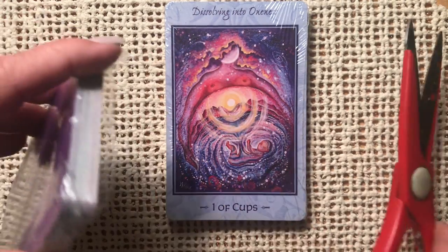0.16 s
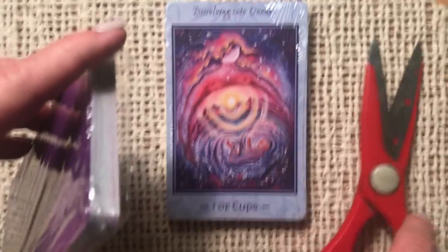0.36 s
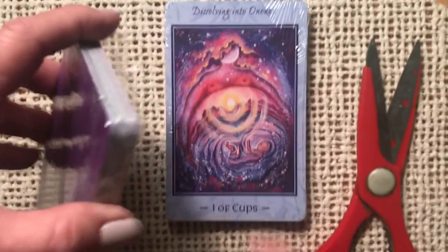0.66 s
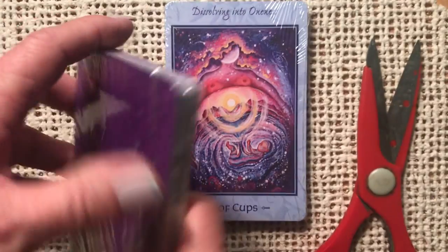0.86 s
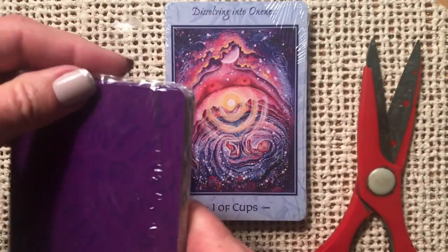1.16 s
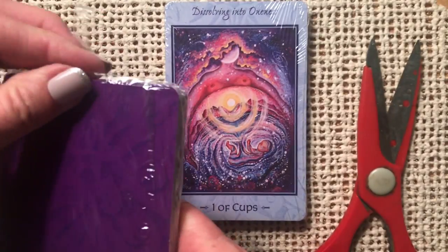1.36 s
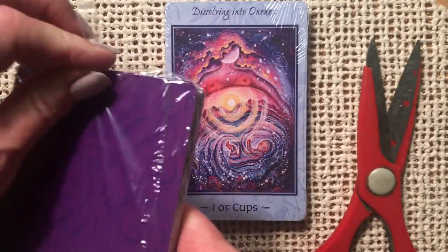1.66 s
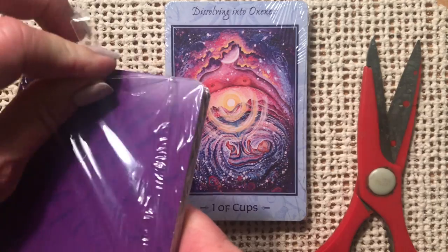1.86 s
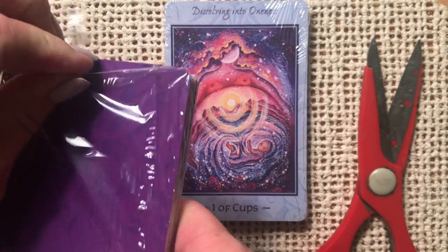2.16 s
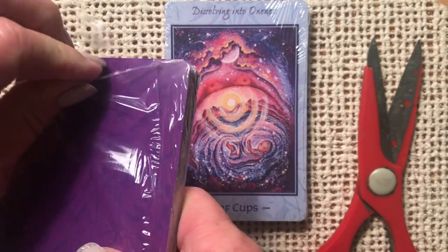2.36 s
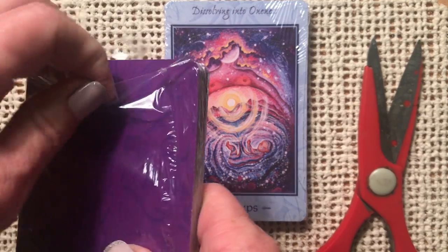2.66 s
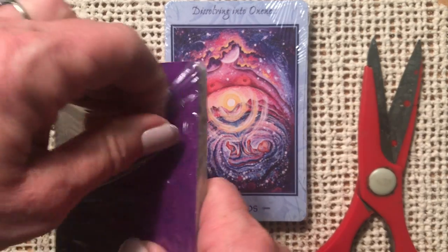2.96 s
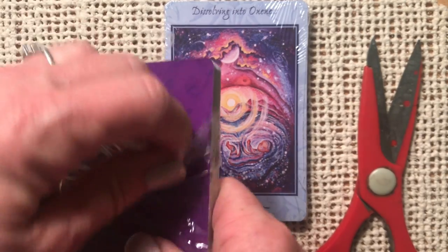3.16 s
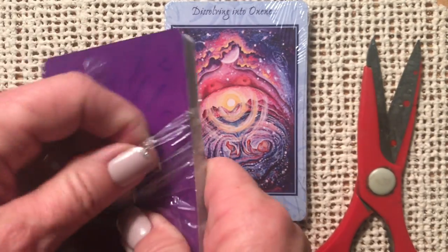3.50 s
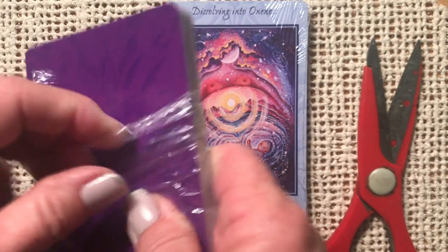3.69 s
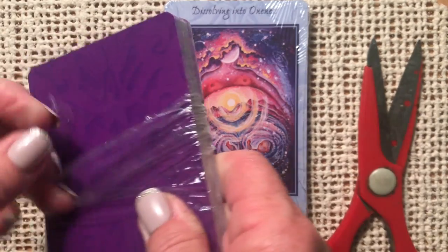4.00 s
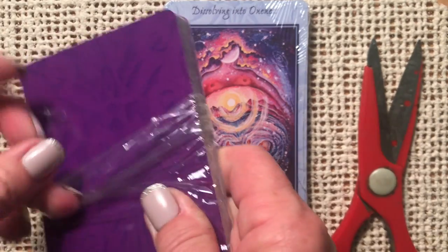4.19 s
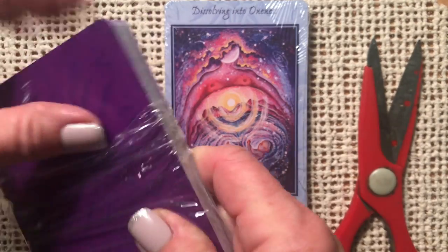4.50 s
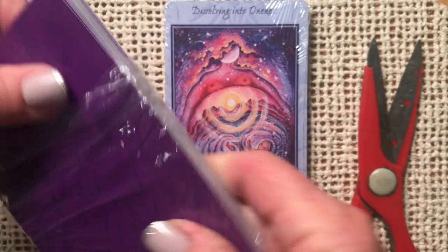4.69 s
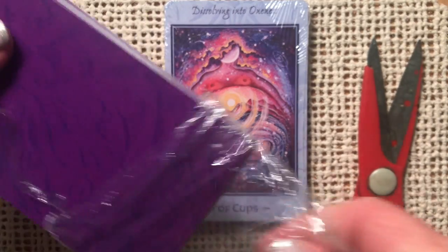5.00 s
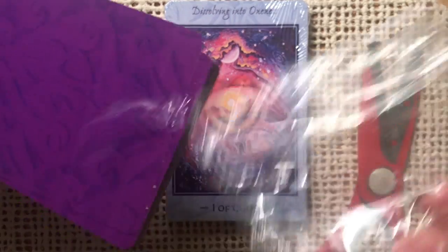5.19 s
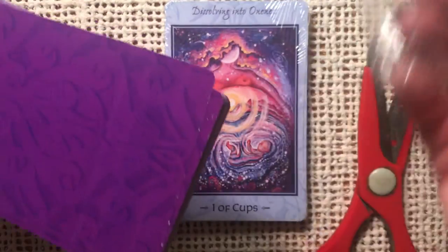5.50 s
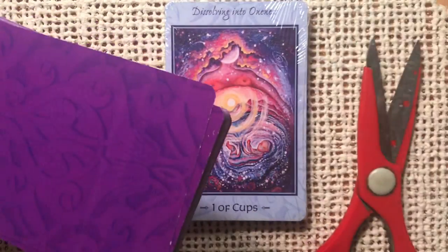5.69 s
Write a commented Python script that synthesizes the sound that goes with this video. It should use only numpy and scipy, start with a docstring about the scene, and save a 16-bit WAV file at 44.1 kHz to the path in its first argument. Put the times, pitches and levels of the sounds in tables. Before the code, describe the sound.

Tight plastic shrink wrap crackles and snaps as it is picked at and peeled off a deck of cards.

```python
"""Tight plastic film is picked at, stretched and pulled off a deck of cards over a cloth-covered table.
Large creases buckle with short snaps that ring the freed film and thump the deck; small ones make a
fine crackle that swells with each tug, over finger rub. Scissors and a hand bump the table, and the
blades clink as they settle. A quiet room rumbles below."""
import sys
import numpy as np
from scipy import signal
from scipy.fft import rfft, irfft
from scipy.io import wavfile

SR = 44100
rng = np.random.default_rng(int(sys.argv[2]) if len(sys.argv) > 2 else 0)


def waveform_to_disk(signal):
    """Save audio, clipped to [-1, 1], as 16-bit WAV at the path in sys.argv[1]."""
    frames = np.transpose(np.atleast_2d(signal))
    scaled = np.clip(frames, -1, 1) * 32767
    samples = np.round(scaled).astype(np.int16)
    wavfile.write(sys.argv[1], SR, samples)


N = 257984

# large creases buckling: start_s, level_db, patch_hz, thump_db, crack_db (last two re level_db)
SNAPS = [(.0519, -26.5, 2970, -36, 11.5), (0.1652, -27, 5730, -9.5, -8), (.223, -25, 6100, -24, -2),
         (0.2637, -35, 9260, -17, 14), (.2855, -31.5, 7020, -28, 4), (.3118, -41.5, 9500, -20, 21.5),
         (0.543, -33, 8910, -20, 10), (.599, -32, 6200, -10, 2), (0.764, -39, 1490, -10, 2),
         (.84, -34, 2180, -9, -1), (0.853, -34, 9000, -12, 5), (.866, -29, 2600, -20, -6),
         (1.011, -25, 2280, -14, 1), (1.0338, -33, 6000, -6, 7.5), (1.041, -32.5, 9000, -21, 14.5),
         (1.1561, -32.5, 2640, -6, 12), (1.1707, -38, 7770, -3, 9), (1.1956, -33, 8500, -3, 16),
         (1.263, -40, 9500, -4, 18), (1.3263, -35.5, 7060, -12, 12), (1.402, -33, 7060, -27, 4),
         (1.585, -20.5, 5860, -25, -5), (1.6365, -30, 6500, -6.5, 7), (1.705, -37, 2830, 2.5, 11),
         (1.7286, -23, 8900, -28, 11), (1.7511, -27, 5840, -11, 10), (1.7624, -38.5, 2280, 0, 20.5),
         (1.8387, -13.5, 5470, -22, -4), (1.8524, -26, 2700, 1.5, 9), (1.8638, -24, 6040, -17, -3),
         (1.9263, -22, 5960, -24, 5), (1.962, -27.5, 9400, -6, 9), (1.986, -29, 6930, -11, 2),
         (2.0043, -31.5, 9500, -8, 17), (2.034, -21.5, 5530, -32, 0), (2.072, -30, 8980, -21, 7),
         (2.0866, -29.5, 2900, -6, 1), (2.1, -19.5, 5700, -17, 0), (2.129, -34, 9020, 4, 19.5),
         (2.1866, -20, 7000, -29, 4), (2.206, -29, 8330, -10, 15), (2.2193, -17, 2570, -10, 5),
         (2.2642, -26.5, 8960, -15, 18), (2.2964, -15.5, 8200, -19, -1), (2.3864, -31, 2000, -6, 11),
         (2.3977, -25, 6800, -3, 17.5), (2.437, -28.5, 5840, -6, 8), (2.4755, -13, 6560, -23, 4),
         (2.4936, -19.5, 8830, -4, -1), (2.517, -22, 3270, -9, 0), (2.5363, -23.5, 2260, -11, -4),
         (2.544, -16.5, 4940, -16, 6), (2.569, -24, 1900, -5, 10), (2.6292, -15.5, 8400, -20, 5),
         (2.6391, -15, 5660, -20, -8), (2.6521, -19.5, 5900, -13.5, 6), (2.716, -24.5, 2020, -4, -9),
         (2.743, -24, 3440, -10, 6), (2.775, -19.5, 3660, -10.5, -15), (2.8206, -14, 4200, -34, 0),
         (2.8487, -14, 6400, -17, 6), (2.874, -11, 8150, -26, -6), (2.9, -12.5, 3600, -15, 3),
         (2.925, -14, 8100, -13, 1), (2.9489, -11, 7040, -28, -2), (2.9663, -14.5, 8330, -12, 1),
         (2.9936, -17, 9320, -19, 10), (3.003, 1.5, 8500, -24, -12), (3.007, -5.5, 2030, -16, 8.5),
         (3.0223, -16, 8180, -6.5, 14), (3.033, -4.5, 6900, -19, -12), (3.047, -16, 8400, -3.5, 13),
         (3.06, -22, 8940, -22, 6), (3.0679, -26, 8760, -28, 8), (3.0947, -15, 2750, -40, -1),
         (3.189, -27, 9500, -31, 20), (3.2178, -18.5, 1630, -7.5, -8), (3.231, -16, 3970, -15, 4),
         (3.2388, -19, 2400, -24, 2), (3.247, -16, 3380, -11, 10), (3.301, -18, 5550, -12.5, 6.5),
         (3.3351, -17.5, 6870, -6, 1), (3.348, -20, 3250, -22, 14), (3.372, -15.5, 6700, -18, -7),
         (3.3936, -21, 2260, -22, 8), (3.406, -13, 6750, -32, 4), (3.4168, -15.5, 1970, -7, 1),
         (3.4271, -18, 8900, -28, -2), (3.4606, -13, 7050, -45, -0.5), (3.503, -15.5, 6720, -21, -9),
         (3.519, -21, 8400, -32, 12), (3.562, -15.5, 6700, -37, 7.5), (3.6196, -12, 7000, -46, -5.5),
         (3.7105, -5, 3400, -28.5, 3), (3.7302, -9, 6540, -26, -23), (3.7584, -6.5, 6700, -28, -3),
         (3.792, -13.5, 5900, -26, 0), (3.8259, -7.5, 6600, -27, 0.5), (3.8454, -14, 5870, -16, -1),
         (3.8504, -18, 6010, -9, 7), (3.8596, -12, 3060, -6.5, 5), (3.8722, -12, 6940, -28, 6),
         (3.926, -5.5, 7000, -33, -9), (3.9355, -0.5, 5860, -37, -24), (3.9561, -2, 3100, -6, -3),
         (3.9737, -6.5, 3320, -29, -9), (4.0013, -17, 3290, -35, 9), (4.036, -23.5, 2980, -20, 6),
         (4.1428, -22, 7460, -35, 0), (4.1763, -31, 2000, -11.5, 14), (4.2097, -27.5, 3200, -27, -2),
         (4.2859, -12, 4260, -25, -20), (4.333, -9.5, 3770, -13, -14), (4.3498, 2.5, 4000, -16.5, 0),
         (4.359, -4, 6140, -15.5, 6.5), (4.3622, -4, 4060, -11, 6), (4.3929, -19.5, 8810, -17, 11),
         (4.4217, -24, 3100, -10.5, 10.5), (4.4587, -25.5, 4100, -25, -1), (4.5412, -22, 3100, -11, -19),
         (4.638, -20.5, 6680, -9, 15.5), (4.688, -32, 7800, -15, 26.5), (4.7911, -16, 9400, -47, 15.5),
         (4.8858, 2, 5530, -17.5, -29), (4.9141, -9, 5600, -19, -3), (4.935, -1.5, 5130, -19, -29),
         (4.9476, -16, 5700, -12, -21), (5.029, -5.5, 6200, -14, 9), (5.055, -5, 6150, -18, 2),
         (5.0981, -24.5, 9100, -9, 21), (5.129, -16, 6000, -11, 1), (5.1753, -23, 2070, -2.5, -1),
         (5.229, -19.5, 1980, -5, 5), (5.2517, -23, 8900, -15, 9), (5.265, -14.5, 9500, -17, 4),
         (5.2734, -20, 9500, -11, 11), (5.3707, -21, 3030, -8, 5.5), (5.4183, -28, 2800, -1, 2),
         (5.4362, -15.5, 9400, -25, 2), (5.4676, -23, 8380, -6, 6), (5.4974, -24, 5250, -26, 8),
         (5.5427, -21, 9400, -16, 4), (5.5585, -24, 1800, -14, -32), (5.6011, -28.5, 1990, -10, 4),
         (5.628, -21, 8250, -13.5, -14), (5.766, -27, 8700, -24, 11), (5.7814, -26, 6870, -13, 0)]
# crackle spectrum: freq_hz, density_db
FILM_SPECTRUM = [(300, -6), (500, 0), (900, 1.5), (1700, 4), (2400, 3), (3400, 3.5), (5800, 4), (7800, 3.5),
                 (11000, 4), (15500, 8.5)]
# tugs at the film: full_from_s, hold_s, level_db, tilt_db_per_oct, deck_db, rub_db (re creases)
TUGS = [(0.06, 0.053, -41, -2.5, -31, -11), (0.252, 0.034, -45, 0.5, 9, -11.5),
        (0.824, 0.037, -42, 0.5, -3, -3.5), (0.971, 0.065, -46, 0, -1, -0.5),
        (1.163, 0.028, -44.5, 0.5, -8, -8), (1.308, 0.016, -45, -4, -17, 1.5),
        (1.987, 0.095, -45, 1.2, -1, -14), (2.211, 0.028, -42, -0.5, 7, -16),
        (2.39, 0.013, -42.5, -8.5, -19, -17), (2.485, 0.078, -35, -1, 2, -14),
        (2.682, 0.024, -40, -0.5, 3, -3), (2.76, 0.021, -35, 1, -24, -6),
        (2.826, 0.031, -29, 1.4, 10.5, -4.5), (2.919, 0.055, -33, 2, 9, -13), (3.006, 0.05, -24, 0, -2, -7),
        (3.16, 0.033, -32.5, 0, -2.5, -4), (3.227, 0.016, -25, -3.5, -14, -6),
        (3.334, 0.068, -32, -3, -20, -11), (3.683, 0.063, -32, -1, -23, 11),
        (3.921, 0.079, -27.5, -3.6, -23, -12), (4.281, 0.083, -28.5, -.5, -6, 0),
        (4.64, 0.015, -25, 2, 2, -1), (4.694, 0.15, -27.5, 0.5, 0, -2.5), (4.853, .1, -25, -0.5, 2, 1.5),
        (4.961, .14, -26, 0.5, 5, -2.5), (5.262, 0.084, -41, -3.5, 0, -12),
        (5.447, 0.053, -38.5, 0.5, 9, -19), (5.672, 0.027, -41, 0, 7, -4)]
# crackle of the film held between tugs: time_s, level_db
GRIP_LEVEL = [(0, -66), (.35, -66), (.47, -46.5), (.7, -62.5), (1.4, -56.5), (1.62, -45.5), (1.7, -51),
              (2.3, -58), (2.6, -53), (2.85, -36), (3.15, -39), (3.42, -35), (3.53, -38.5), (3.68, -33),
              (3.8, -39), (4.0, -35.5), (4.15, -55.5), (4.27, -39.5), (4.56, -50), (5.13, -35.5),
              (5.35, -41.5), (5.53, -50.5), (5.85, -44)]
# bumps on the table: start_s, force_db, contact_cutoff_hz
BUMPS = [(.2525, -35, 900), (.2585, -22.5, 292), (.4125, -41, 1600), (.4195, -38, 1400),
         (.428, -37.5, 1000), (.462, -41, 1000), (.4905, -35.5, 503), (5.8145, -32, 700),
         (5.8275, -29, 800), (5.8355, -29.5, 900)]
# table modes: freq_hz, gain_db, t60_s
TABLE_MODES = [(39.5, -13.5, 0.64), (81.6, -10.5, 0.3), (134, 6, 0.028), (186, -7.5, 0.06), (223, -6, 0.2),
               (372, -10, 0.11), (594, -6.5, 0.02), (894, -6, 0.054)]
# scissor clinks: start_s, force_db
CLINKS = [(0.409, -54), (.418, -45), (.444, -53), (0.468, -50.5), (0.492, -54), (.526, -62)]
# blade modes: freq_hz, gain_db, t60_s
BLADE_MODES = [(1000, -17, 0.018), (1360, 4, 0.02), (1720, 1, 0.032), (1890, -2, 0.057), (2430, -3, 0.034),
               (3535, 5, 0.027), (3570, -3, 0.034)]
# air and microphone noise: freq_hz, density_db
AIR_SPECTRUM = [(18, -45), (30, 0), (291, -4.5), (420, -14.5), (1240, -19.5), (1570, -24), (2340, -20),
                (2600, -26), (4900, -29), (12700, -31.5), (16500, -31.5)]
# room rumble: time_s, level_db
RUMBLE_LEVEL = [(0, -52.5), (.8, -62), (1.35, -55.5), (1.95, -47), (2.6, -51), (3.8, -51.5), (4.7, -52.5),
                (5.08, -45.5), (5.3, -54.5), (5.85, -54)]
# rumble resonances: centre_hz, width_hz, gain_db
RUMBLE_BANDS = [(62.5, 30, 4), (77.3, 15, 0), (100.3, 22, 0), (138, 7.2, -7.5)]
# microphone dips: centre_hz, width_hz, gain_db
MIC_DIPS = [(4800, 980, -3), (10440, 820, -5)]

PATCH_T60_CYCLES, CRACK_T60_S = 16, .002
POP_DB, POP_DB_PER_DB = -10.5, .15   # re thump, for a 0 dB snap
MEAN_PULL_DB = -39.5   # crackle level of an ordinary pull; reference for the next three lines
CREASES_PER_S, CREASE_RATE_DB_PER_DB = 700, .3
TAUT_DB, TAUT_DB_PER_DB = -14.5, .63
RISE_DB_PER_S, RISE_DB_PER_DB = 420, .45   # a harder tug catches more abruptly
FALL_DB_PER_S = 459
CREASE_SPREAD_DB, CREASE_MAX_SPREADS = 4.5, 3.8
TAUT_HZ, TAUT_WIDTH_HZ, DECK_HZ = 5960, 960, 1400
GRIP_TILT_DB_PER_OCT, GRIP_DECK_DB, GRIP_RUB_DB = -1.5, -11, -8.5
AIR_DB, ROOM_T60_S, ROOM_WET_DB = -52.5, .09, -24
MIC_BASS_CUT_HZ = 42
DULL_ABOVE_HZ, DULL_DB, TREBLE_END_HZ = 15850, -8, 17000


def film_snaps():
    """A crease buckles: a crack, a few cycles of the freed patch, a shiver, a deck thump and low pop."""
    start_s, level_db, patch_hz, thump_db, crack_db = np.array(SNAPS).T[:, :, None]
    t = np.arange(SR // 70) / SR
    noise = rng.standard_normal((len(start_s), 4, len(t)))
    noise[:, 2, 3] *= 3.0   # the crack opens with one hard spike

    def burst(stream, t60_s, tail_db, band_hz):
        """Band noise with a fast decay and a slower tail, peak 1."""
        decay = from_db(-60 * t / t60_s) + from_db(tail_db - 60 * t / .015)
        attack = 1 - np.exp(-t / .0001)
        x = band(noise[:, stream] * decay * attack, *band_hz)
        return x / np.abs(x).max(axis=1, keepdims=True)

    cycles = t * patch_hz
    patch = np.sin(2 * np.pi * cycles) * from_db(-60 * cycles / PATCH_T60_CYCLES)
    patch *= 1 - np.exp(-1.8 * cycles)
    shiver = burst(0, t60_s=.0053, tail_db=-9, band_hz=(3660, 8680))
    thump = burst(1, t60_s=.0068, tail_db=-6.5, band_hz=(870, 3320))
    crack = burst(2, t60_s=CRACK_T60_S, tail_db=-17.5, band_hz=(10270, 20300))
    pop = burst(3, t60_s=.01, tail_db=-13, band_hz=(380, 827))
    deck = thump + from_db(POP_DB + POP_DB_PER_DB * level_db) * pop
    snap = .83 * patch + .5 * shiver + from_db(thump_db) * deck + from_db(crack_db) * crack
    out = np.zeros(N + len(t))
    np.add.at(out, np.round(start_s * SR).astype(int) + np.arange(len(t)), from_db(level_db) * snap)
    return out[:N]


def film_crackle():
    """Small creases come in clumps; each shakes a random patch for a few cycles, over finger rub."""
    level_db, tilt_db_per_oct, deck_db, rub_db = handling()
    pull_db = level_db - MEAN_PULL_DB
    base_per_s = CREASES_PER_S * from_db(CREASE_RATE_DB_PER_DB * pull_db)
    clumped_per_s = base_per_s * from_db(6 * drift(cutoff_hz=45))
    size_db = CREASE_SPREAD_DB * np.minimum(rng.exponential(1, N), CREASE_MAX_SPREADS)
    sizes = from_db(size_db) * rng.choice([-1, 1], N)
    creases = sizes * (rng.random(N) < clumped_per_s / SR) / np.sqrt(base_per_s)
    patch_log_hz = rng.uniform(np.log(500), np.log(16000), N)
    rub, rub_gain = rng.standard_normal((2, N)), from_db(rub_db)
    edges_hz = 300 * 2 ** np.arange(0, 6.1, .5)
    out = np.zeros(N)
    for k, (low_hz, high_hz) in enumerate(zip(edges_hz, edges_hz[1:])):
        hz = np.sqrt(low_hz * high_hz)
        share = np.exp(-((np.log(hz) - patch_log_hz) / .33) ** 2)   # loudest near its own patch pitch
        grains = rms_one(band(creases * share, low_hz, high_hz))
        friction = rub_gain * rms_one(band(rub[k % 2], low_hz, high_hz))
        drum_db = deck_db / (1 + (hz / DECK_HZ) ** 4)   # film lying on the cards sounds fuller below
        colour_db = at_hz(FILM_SPECTRUM, hz) + tilt_db_per_oct * np.log2(hz / 5000) + drum_db
        out += (grains + friction) * np.sqrt(high_hz - low_hz) * from_db(colour_db)
    taut = resonance(out, TAUT_HZ, TAUT_WIDTH_HZ)   # the stretched sheet favours one band
    out += from_db(TAUT_DB + TAUT_DB_PER_DB * pull_db) * taut
    return from_db(level_db) * rms_one(out / np.sqrt(1 + rub_gain ** 2))


def handling():
    """Grip plus tugs: crackle level, then power-weighted tilt, deck drumming and rub."""
    t = np.arange(N) / SR
    full_from_s, hold_s, level_db, *tug_colours = np.array(TUGS).T[:, :, None]
    rise_db_per_s = RISE_DB_PER_S * from_db(RISE_DB_PER_DB * (level_db - MEAN_PULL_DB))
    before_s, after_s = np.maximum(full_from_s - t, 0), np.maximum(t - full_from_s - hold_s, 0)
    tug_power = from_db(level_db - rise_db_per_s * before_s - FALL_DB_PER_S * after_s) ** 2
    grip_power = gain_curve(GRIP_LEVEL) ** 2
    power = grip_power + tug_power.sum(axis=0)
    grip_colours = GRIP_TILT_DB_PER_OCT, GRIP_DECK_DB, GRIP_RUB_DB
    colours = [(grip * grip_power + tugs[:, 0] @ tug_power) / power
               for grip, tugs in zip(grip_colours, tug_colours)]
    return 10 * np.log10(power), *colours


def table_bumps():
    """Scissors and a hand ring the table's low modes."""
    return strike(BUMPS, TABLE_MODES, spread_db=2.5)


def scissor_clinks():
    """Settling blades ring from hard contacts."""
    cutoff_hz = 6000
    return strike([(start_s, db, cutoff_hz) for start_s, db in CLINKS], BLADE_MODES, spread_db=3)


def strike(hits, modes, spread_db):
    """Each hit rings every mode with a random strength; a soft contact spreads the push."""
    out = np.zeros(N)
    for start_s, force_db, cutoff_hz in hits:
        at, r = round(start_s * SR), np.exp(-2 * np.pi * cutoff_hz / SR)
        click = np.zeros(min(N - at, SR // 2))
        click[0] = from_db(force_db)
        push = signal.lfilter([(1 - r) ** 2], [1, -2 * r, r * r], click)
        for k, (hz, gain_db, t60_s) in enumerate(modes):
            gain = (-1) ** k * from_db(gain_db + spread_db * rng.standard_normal())
            out[at:at + len(click)] += gain * ring(push, hz, t60_s)
    return out


def room_reflections(x):
    """A short, slightly dull noise tail, 3 ms late."""
    t = np.arange(SR // 4) / SR
    tail = band(rng.standard_normal(len(t)), 200, 5900) * from_db(-60 * t / ROOM_T60_S) * (t > .003)
    return signal.fftconvolve(x, tail / np.sqrt(np.sum(tail ** 2)))[:N]


def room_tone():
    """Steady air and microphone noise, and a low wavering rumble."""
    bins_hz = np.maximum(np.fft.rfftfreq(N, 1 / SR), 1)
    air = irfft(rfft(rng.standard_normal(N)) * from_db(at_hz(AIR_SPECTRUM, bins_hz)), N)
    rumble = np.zeros(N)
    for hz, width_hz, gain_db in RUMBLE_BANDS:
        narrow = resonance(rng.standard_normal(N), hz, width_hz)
        rumble += from_db(gain_db) * rms_one(resonance(narrow, hz, width_hz))
    return from_db(AIR_DB) * rms_one(air) + gain_curve(RUMBLE_LEVEL) * rms_one(rumble)


def from_db(db):
    """Decibels to gain."""
    return 10 ** (np.asarray(db) / 20)


def rms_one(x):
    """Scale to rms 1."""
    return x / np.sqrt(np.mean(x ** 2) + 1e-20)


def gain_curve(points):
    """Gain per sample from rows of time_s, level_db."""
    return from_db(np.interp(np.arange(N) / SR, *np.transpose(points)))


def at_hz(points, hz):
    """Read a spectrum table on a log-frequency axis."""
    freq_hz, db = np.transpose(points)
    return np.interp(np.log(hz), np.log(freq_hz), db)


def drift(cutoff_hz):
    """Slow low-passed noise, rms 1."""
    hop, warmup = 40, 2000
    r = np.exp(-2 * np.pi * cutoff_hz * hop / SR)
    slow = signal.lfilter([1], [1, -2 * r, r * r], rng.standard_normal(N // hop + warmup + 2))[warmup:]
    return np.interp(np.arange(N) / hop, np.arange(len(slow)), rms_one(slow))


def band(x, low_hz, high_hz):
    """Butterworth band-pass."""
    sos = signal.butter(2, [low_hz, min(high_hz, .45 * SR)], "band", fs=SR, output="sos")
    return signal.sosfilt(sos, x)


def ring(x, hz, t60_s):
    """One mode: a unit click starts a decaying sine of height 1."""
    r, w = from_db(-60 / (t60_s * SR)), 2 * np.pi * hz / SR
    return signal.lfilter([0, np.sin(w)], [1, -2 * r * np.cos(w), r * r], x + 1e-18)


def resonance(x, hz, width_hz):
    """Two-pole peak of gain 1."""
    r, w = np.exp(-np.pi * width_hz / SR), 2 * np.pi * hz / SR
    return signal.lfilter(np.array([1, 0, -1]) * (1 - r * r) / 2, [1, -2 * r * np.cos(w), r * r], x)


def scene():
    """Film, table and scissors in the room, mono."""
    film = film_snaps() + film_crackle()
    bumps = table_bumps()
    clinks = scissor_clinks()
    reflections = from_db(ROOM_WET_DB) * room_reflections(film + clinks)
    return (film + bumps + clinks + reflections + room_tone())[None]


def record(dry):
    """Microphone bass cut, two dips and clipping; then the treble dulls above 16 kHz, ends at 17 kHz."""
    x = signal.sosfilt(signal.butter(2, MIC_BASS_CUT_HZ, "high", fs=SR, output="sos"), dry)
    for hz, width_hz, gain_db in MIC_DIPS:
        x = x - (1 - from_db(gain_db)) * resonance(x, hz, width_hz)
    bins_hz = np.fft.rfftfreq(N, 1 / SR)
    dulling = from_db(DULL_DB / (1 + np.exp(-(bins_hz - DULL_ABOVE_HZ) / 80)))
    x = irfft(rfft(np.clip(x, -1, 1)) * dulling, N)
    return signal.sosfilt(signal.cheby2(16, 95, TREBLE_END_HZ, fs=SR, output="sos"), x)


dry = scene()
out = record(dry)
waveform_to_disk(out)
```